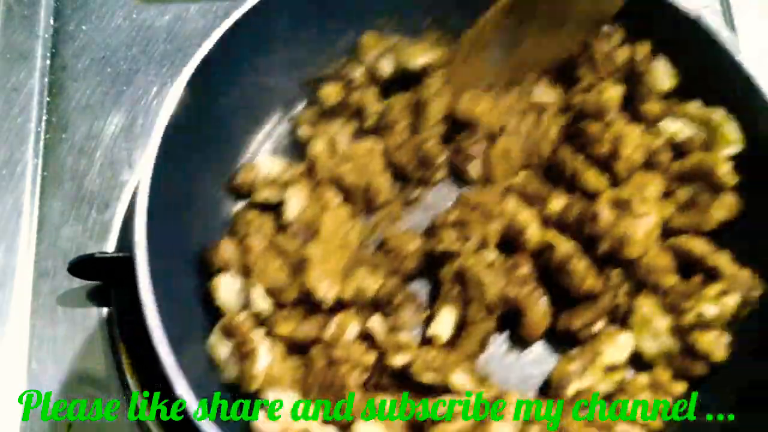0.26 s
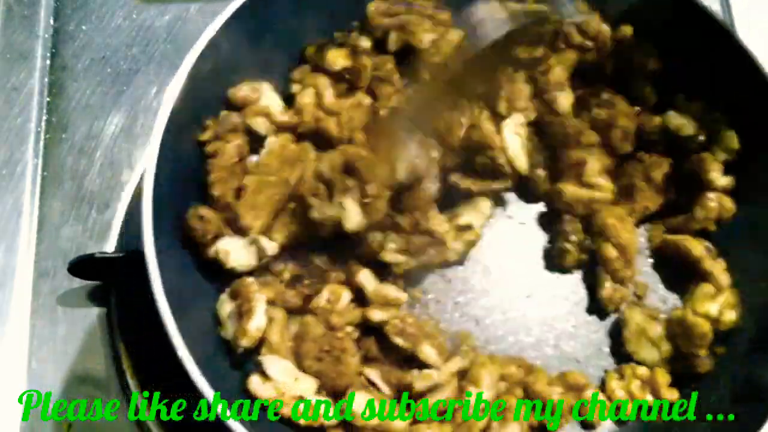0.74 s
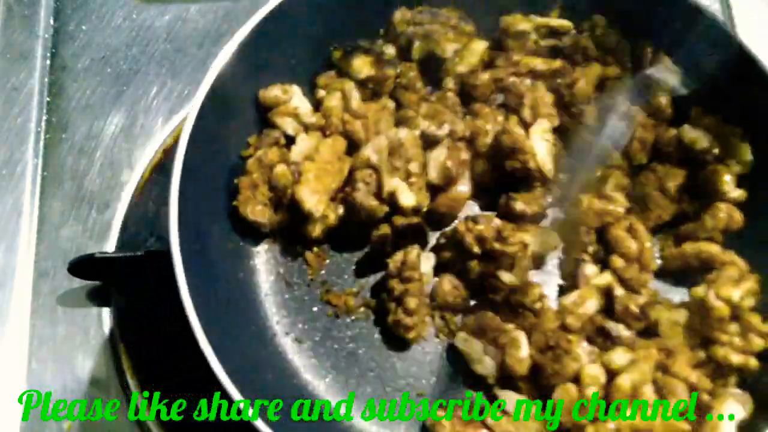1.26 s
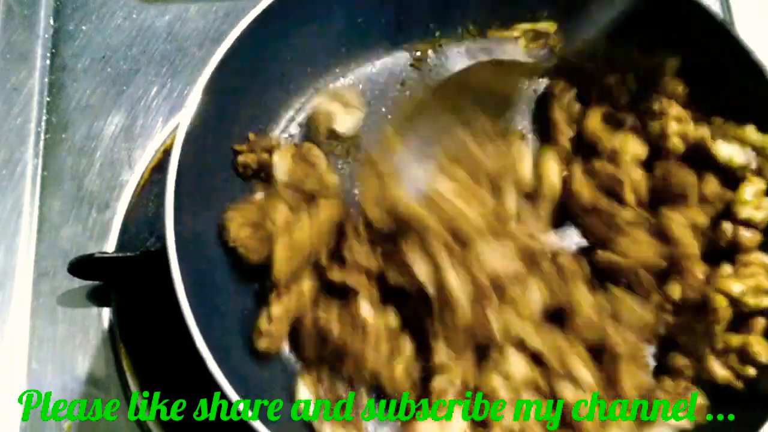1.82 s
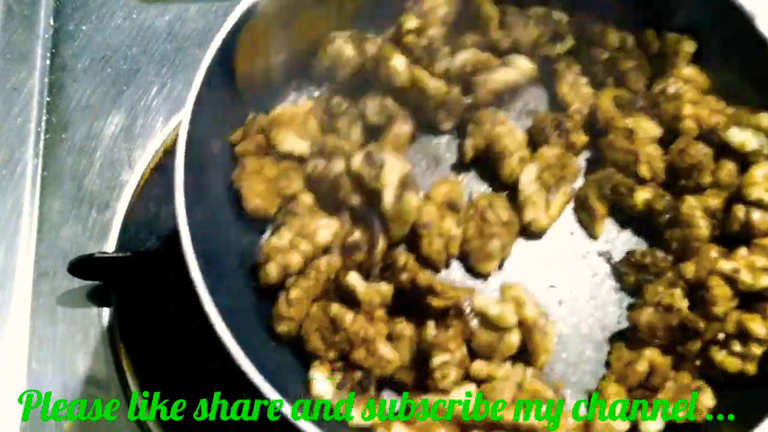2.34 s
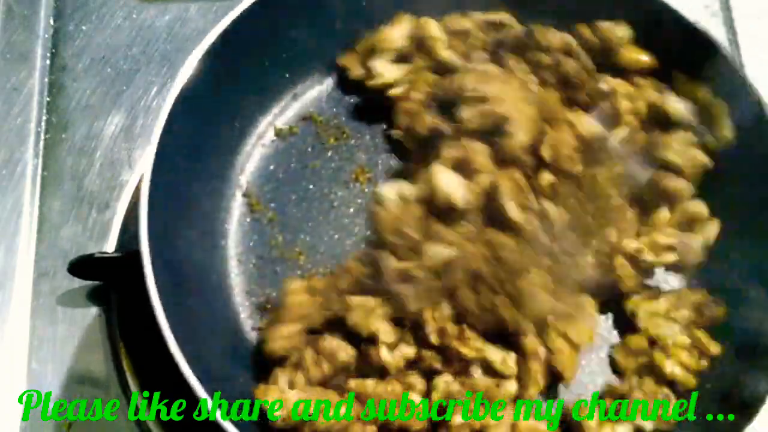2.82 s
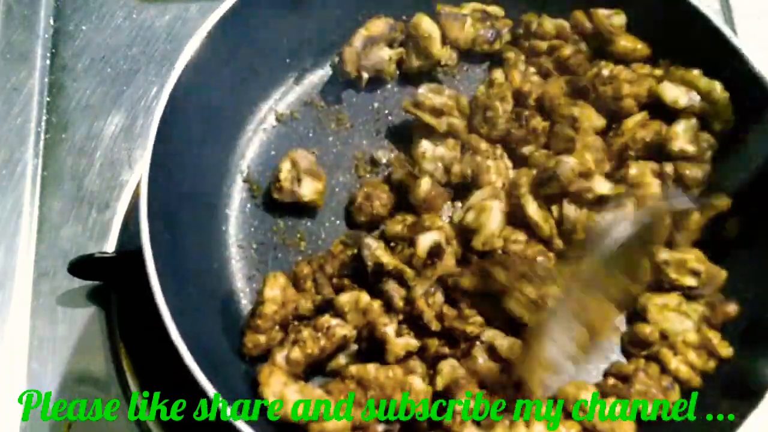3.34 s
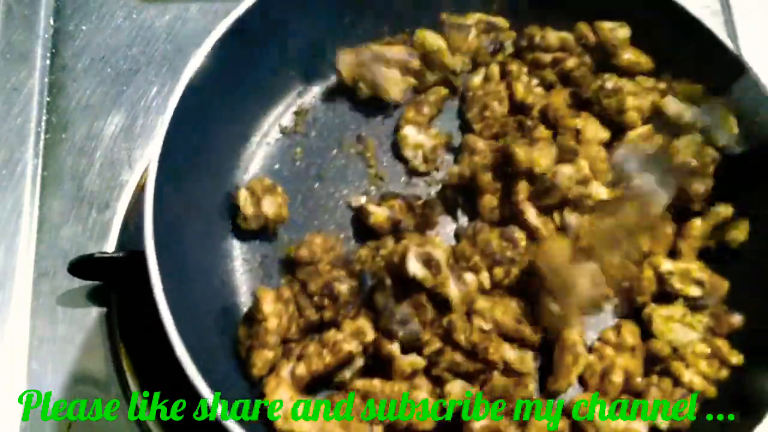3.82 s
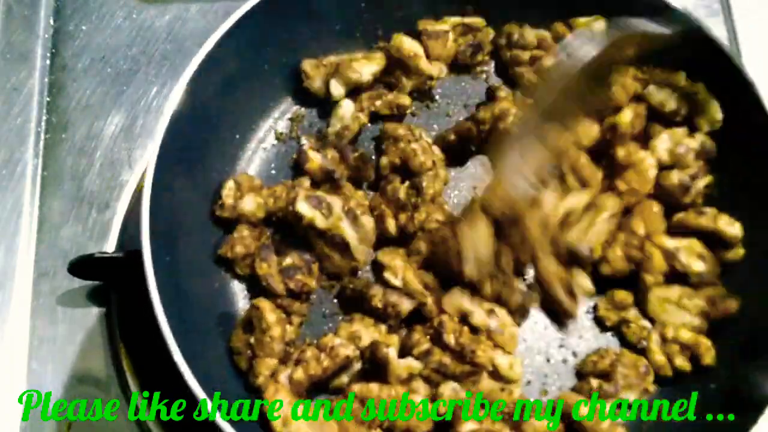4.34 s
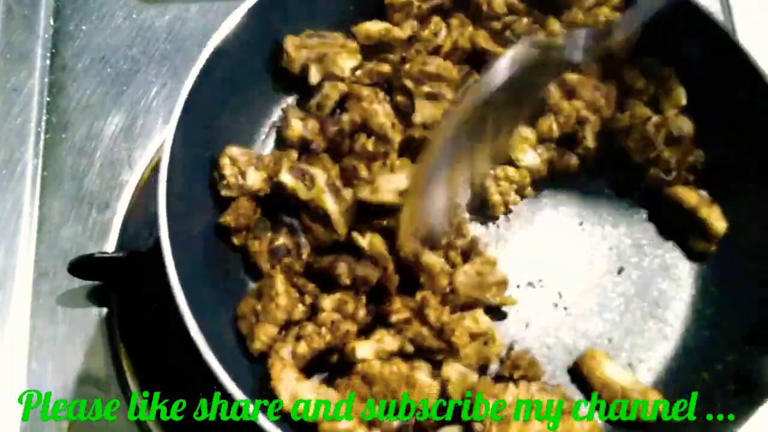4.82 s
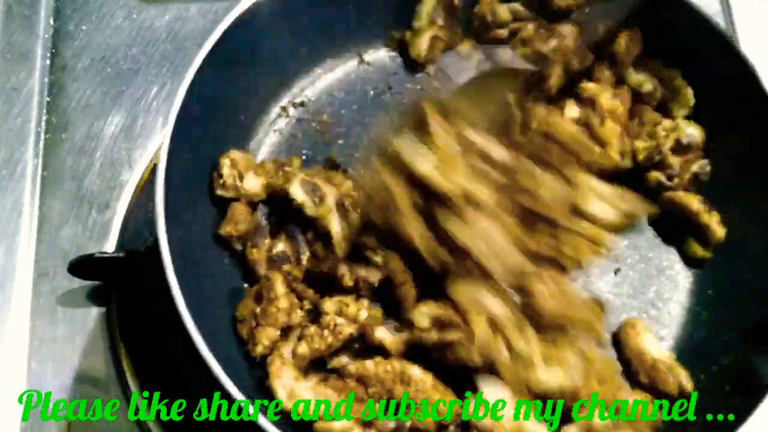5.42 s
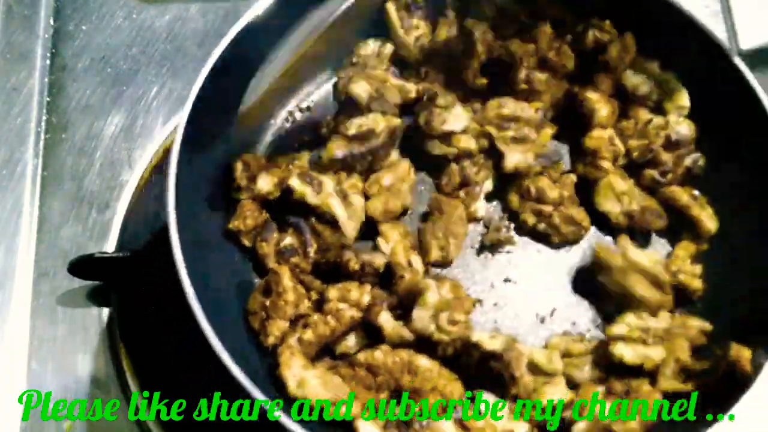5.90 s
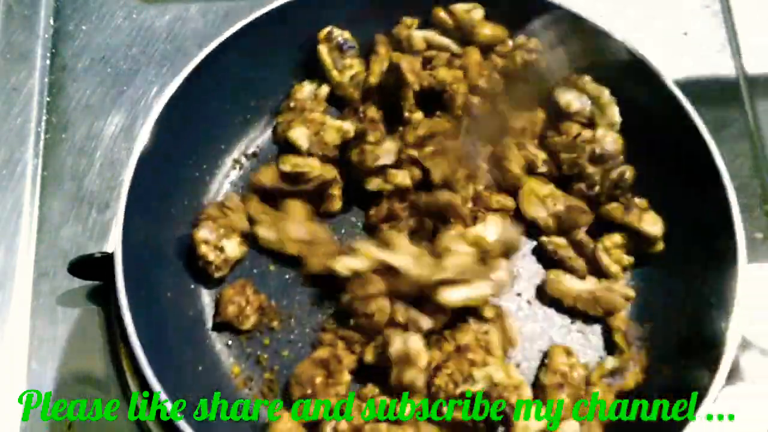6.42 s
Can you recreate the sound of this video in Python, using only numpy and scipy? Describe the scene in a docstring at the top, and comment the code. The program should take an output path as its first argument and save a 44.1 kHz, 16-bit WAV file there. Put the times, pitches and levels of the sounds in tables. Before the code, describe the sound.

Close stereo pickup in a small kitchen: gentle nut rattling at first, a firm spoon knock just after one second, then a bright metallic clack with a short scrape. Steady uneven stirring continues, nuts pattering between strokes. Strong knocks return around four and a half and five seconds, followed by a raspy scrape, then softer tumbling and airy swishes to the end. Low rumble and faint hum lie underneath.

```python
"""Walnuts tumble and rub in a non-stick pan as a steel spoon stirs them, close to a phone in a small kitchen.
Modal synthesis: random small contacts excite the pan's damped modes, louder during each stroke.
The spoon knocks the pan with a tick of its own steel and now and then scrapes it; single nuts drop back.
Filtered noise makes the grate bumps, swishes, rumble and thin high hiss; sines make a faint hum and drone.
"""
import sys
import numpy as np
from scipy import signal
from scipy.fft import rfft, irfft, next_fast_len
from scipy.io import wavfile
from scipy.ndimage import uniform_filter1d, map_coordinates

SR = 44100
rng = np.random.default_rng(int(sys.argv[2]) if len(sys.argv) > 2 else 0)


def transcribe(signal):
    """Save signal, clipped to [-1, 1], as a 16-bit WAV file at the path in sys.argv[1]."""
    frames = np.atleast_2d(signal).T
    limited = np.clip(frames, -1, 1)
    pcm = np.round(limited * 32767).astype(np.int16)
    wavfile.write(sys.argv[1], SR, pcm)


N = 293641  # length in samples

# Modes of the pan loaded with nuts. Each row: frequency in Hz, relative level in dB,
# undamped-by-spoon t60 in s, phase lead of the right side in radians.
PAN_MODES = [(980.3, 8.5, 0.048, -0.54), (1059, -6.5, 0.063, -0.8), (1814.6, 2.5, 0.057, 1.48),
             (2864, 3, 0.032, -2), (3014, -17, 0.08, -1), (3440, -13.5, 0.067, -2.5),
             (3710, -24, 0.089, -0.5), (4247, -3.5, 0.036, -1.88), (4390, -27.5, 0.079, 0.5),
             (4820, -10.5, 0.045, 1.5), (5808, -12, 0.04, -1.5), (6195, -20, 0.063, 4.5)]
# Modes of the steel spoon. Each row: frequency in Hz, relative level in dB, t60 in s,
# phase lead of the right side in radians.
SPOON_MODES = [(7350, -9, .025, 1), (7640, -3, .025, 0), (8650, -9, .025, -1), (9585, -1, .045, .4),
               (10600, -3, .028, -1.2), (11280, -4, .02, 2), (11920, 0, .04, .5), (12350, -2, .025, -1),
               (12750, -2, .025, -2), (13100, -6, .022, 1), (14000, -8, .02, 1.4)]
# Broad crack of a contact on the pan. Each row: frequency in Hz, relative density in dB per Hz.
CRACK_SPECTRUM = [(60, -47), (400, -16), (600, -21.5), (780, -8.5), (950, 28), (1300, 17.5), (2200, 7),
                  (2500, 14), (3100, 15), (4500, 9), (5000, 7.5), (5400, -3.5), (6300, -1.5), (7200, -53),
                  (12000, -49)]
# Broad click of the spoon's steel. Each row: frequency in Hz, relative density in dB per Hz.
TICK_SPECTRUM = [(3000, -58), (6000, -13), (8500, -10.5), (10000, 3), (11500, -1), (14000, -11),
                 (15500, -13)]
LEAD_SCATTER = 0.76  # radians by which the contact spot shifts a mode between the sides
LEAN_SCATTER_DB = 3.5  # the contact spot also beams each mode more to one side
PAN_LOW_HZ, BLOW_LOW_HZ = 842, 740  # tumbling and blows radiate little below these

# Low rumble of the kitchen. Each row: frequency in Hz, relative density in dB per Hz.
RUMBLE_SPECTRUM = [(15, -7.5), (25, -34), (45, -0.5), (70, 1), (115, -2), (170, -6.5), (240, -12.5),
                   (325, -10.5), (450, -18), (700, -20.5), (1000, -38), (1500, -36), (2200, -70),
                   (3500, -121)]
# High hiss, also the colour of the crumbs. Each row: frequency in Hz, relative density in dB per Hz.
HISS_SPECTRUM = [(8600, -44.5), (9600, -6.5), (10700, -0.5), (11800, 1), (13000, -3), (14200, -8),
                 (15000, -21), (16000, -56.5)]
# Hum partials. Each row: mean frequency in Hz, middle level in dB rms.
HUM_PARTIALS = [(52, -65.5), (101, -61), (138, -64.5), (312, -70.5)]
# Path of the drone. Each row: time in seconds, frequency in Hz, level in dB rms.
DRONE_PATH = [(2.6, 67, -75), (2.95, 66.8, -56.5), (3.3, 67.6, -54), (3.7, 69.35, -50.5),
              (3.98, 74.6, -46.5), (4.2, 75, -73)]
RUMBLE_DB, RUMBLE_WAVER_DB, HUM_WAVER_DB, HISS_DB = -52, 1.98, 4.5, -64.5
# Likeness of the two sides in diffuse noise. Each row: frequency in Hz, correlation from 0 to 1.
SIDE_LIKENESS = [(60, 0.94), (130, 0.99), (260, 0.74), (500, 0.45), (1000, 0.33), (2000, 0.2), (10000, 0)]

# Strokes of the spoon through the nuts. Each row: start in seconds, push in s, release in s,
# tumbling level in dB, rubbing level in dB.
STROKES = [(0.274, 0.064, 0.18, -56.5, -64), (0.551, 0.16, 0.071, -48.5, -55),
           (1.027, 0.13, 0.085, -51, -50.5), (1.41, 0.064, 0.11, -47.5, -52.5),
           (1.721, 0.049, 0.2, -48.5, -47.5), (2.074, 0.091, 0.14, -43.5, -55.5),
           (2.388, 0.088, 0.19, -55, -53), (2.761, 0.11, 0.025, -48.5, -56.5),
           (3.069, 0.067, 0.1, -51, -58), (3.382, 0.026, 0.17, -52, -60), (3.649, 0.045, 0.11, -49.5, -51),
           (3.973, 0.052, 0.11, -46.5, -53.5), (4.265, 0.058, 0.22, -61.5, -59.5),
           (4.572, 0.12, 0.093, -48, -49), (5.027, 0.027, 0.24, -55.5, -60),
           (5.339, 0.086, 0.2, -50.5, -56.5), (5.67, 0.096, 0.16, -47.5, -54.5),
           (6.031, 0.085, 0.15, -51.5, -56.5), (6.331, 0.08, 0.083, -48.5, -53.5)]
STROKE_DEPTH_DB, PUSH_SHAPE, RELEASE_SHAPE = 25, 2.05, 1.94  # drop at both ends; powers of rise and fall
TUMBLE_LAG_S, TUMBLE_LINGER = 0.006, 1.33  # the nuts follow the spoon late and settle more slowly
ROLL_DB, ROLL_SHARE = -1, 0.57  # rolling lies between tumbling and rubbing; share of rubbing in its level
REST_TUMBLE_DB, REST_RUB_DB = -68.5, -84.5  # nuts settling between strokes
RUB_CLUMP_DB, RUB_CLUMP_RATE = 2.5, 70  # rubbing catches and slips in clumps: spread, knots per second

# Single nuts dropping on the pan floor. Each row: time in seconds, first mode in Hz,
# first mode level in dB, second mode over the first in dB.
DROPS = [(0.0035, 950, -42, -5.5), (0.0619, 1000, -43.5, -12), (0.3418, 907, -48, -16),
         (0.3982, 964, -45, -28), (0.4363, 947, -46.5, -32), (0.6515, 990, -47, -1), (0.716, 990, -49, -26),
         (0.748, 970, -50, -10), (0.9776, 945, -41, -43), (1.132, 1030, -39.5, -29), (1.394, 1003, -46, -9),
         (1.4172, 960, -46, -21), (1.45, 1020, -43.5, -24), (1.4925, 1026, -43, -19),
         (1.5243, 972, -40.5, -32), (1.584, 960, -44.5, -30), (1.785, 946, -40, -23), (1.8846, 960, -49, 0),
         (2.1794, 983, -56, -14), (2.2226, 1000, -38, -11), (2.308, 973, -45.5, -26),
         (2.509, 975, -37.5, -14), (2.6445, 1014, -38, -22), (2.671, 960, -46.5, -18),
         (2.7416, 995, -49.5, -29), (2.875, 970, -36, -24.5), (2.94, 996, -45, -17.5),
         (3.1672, 994, -46.5, -2), (3.2429, 980, -45.5, -11), (3.4474, 944, -47, -5),
         (3.4673, 983, -42, -9), (3.5188, 985, -46, -5.5), (3.7605, 978, -43, -31),
         (3.8741, 1023, -43.5, -14), (4.0751, 953, -43.5, -18.5), (4.142, 991, -40.5, -34),
         (4.179, 960, -49.5, -28), (4.349, 947, -46, -9.5), (4.3756, 1020, -46, -20),
         (4.6857, 936, -45.5, 3), (4.9819, 953, -46, -42), (5.0616, 1025, -44, -23),
         (5.3895, 928, -38.5, -16), (5.4885, 980, -53, -6), (5.5894, 956, -43.5, -21),
         (5.605, 968, -44.5, -16), (5.769, 990, -45, -15), (5.8106, 980, -43.5, -11),
         (5.881, 1000, -42, -22), (5.923, 978, -47, -7.5), (6.022, 977, -46, -8), (6.0567, 980, -44.5, -25),
         (6.1031, 1010, -49.5, 2), (6.1329, 1050, -46.5, -3), (6.172, 1004, -49.5, -0.5),
         (6.217, 995, -50, -21), (6.259, 1005, -52.5, -12), (6.381, 970, -45, -19), (6.4057, 980, -53, -15),
         (6.4624, 1020, -46.5, -11), (6.64, 1034, -48.5, -10)]
DROP_HARDNESS_DB, DROP_LEAN_DB, DROP_DAMPING = -11, 12.5, 1  # soft nut: upper modes against the second
DROP_SECOND_HZ, DROP_SPREAD_HZ = 1860, 51  # the landing spot moves the second mode

# Spoon knocking the pan. Each row: time in seconds, first mode in Hz, second mode in Hz,
# first mode level in dB, second mode over the first in dB,
# hardness (upper modes over the first) in dB, left minus right in dB.
KNOCKS = [(0.6273, 1020, 1770, -50, 0, -7, 4), (0.6765, 1020, 1800, -45, -4, -7, 20),
          (1.096, 985, 1800, -41.5, -11, -19, -10), (1.1553, 1030, 1810, -30.5, -5.5, -11, -7),
          (1.1643, 954, 1840, -46, 14, -17, -11), (1.728, 1000, 1746, -35, 6, 9, -4),
          (1.729, 1273, 1700, -33, -8, -23, 4), (1.853, 990, 1790, -48, -5, -5, 17),
          (2.1311, 988, 1810, -37.5, -18, -35, 8), (2.1515, 1038, 1790, -38.5, 0.5, -10, 10.5),
          (2.409, 948, 1760, -33, -9, -21.5, 8), (2.4584, 930, 1790, -32.5, -30, -12.5, -4),
          (3.078, 1020, 1840, -46, -6, -28.5, 4), (3.1345, 1030, 1805, -52.5, 9.5, -9, -2),
          (3.3992, 1006, 1820, -46.5, 12.5, -5, 3.5), (3.6617, 860, 1770, -43.5, -18, -17, -2),
          (3.7311, 1004, 1830, -39, -11.5, -38, 14), (4.0165, 970, 1860, -48, -5, -7, -8),
          (4.029, 1097, 1750, -35.5, -2.5, -12, 12), (4.32, 1010, 1816, -35, 7, -1, 1),
          (4.4702, 993, 1760, -36, -12, -10.5, -2), (4.5784, 1005, 1890, -25, -4.5, 1.5, 0),
          (4.61, 953, 1930, -49, 6.5, 4.5, 13), (4.7132, 1004, 1825, -34, -5.5, -28, -16),
          (5.073, 1060, 1830, -38.5, -9, -28, 6), (5.0783, 1030, 1900, -29, -18, -22.5, 3),
          (5.1267, 983, 1840, -38.5, -2, -21, -3), (5.2115, 1014, 1840, -37, -5.5, -12.5, -1),
          (5.237, 1030, 1800, -49.5, 3.5, -8, 5), (5.3318, 954, 1770, -36.5, -12, -28, 3.5),
          (5.5445, 1000, 1790, -39.5, -9, -17, -1), (5.6446, 1000, 1680, -49.5, -2.5, -13, -5),
          (5.7468, 954, 1780, -52, 3, -5, 3), (5.9809, 1015, 1810, -33, -9, -20.5, 9),
          (6.429, 985, 1800, -40.5, -4, -30, -10)]
SPOON_DAMPING = 0.82  # the pressing spoon shortens the pan's ring by this factor
STEEL_DB = -21  # steel tick against the upper modes
EDGE_HARDNESS_DB, EDGE_SLOPE = 2.5, 3.92  # above this the bare edge hits; tick growth in dB per dB

# Spoon edge sliding on the coating. Each row: middle in seconds, half length in s,
# lower pan modes in dB, higher pan modes in dB, steel in dB.
SCRAPES = [(1.16, 0.015, -53, -48, -56.5), (1.732, 0.0029, -25, -29, -28.5),
           (1.761, 0.014, -46.5, -48, -46), (1.816, 0.0082, -38, -39, -47.5),
           (1.865, 0.0072, -43.5, -63, -62), (2.483, 0.013, -33.5, -41, -42.5),
           (2.499, 0.012, -52, -43.5, -61), (2.831, 0.018, -56.5, -60, -75),
           (3.133, 0.0067, -63, -53, -80.5), (4.292, 0.0059, -50.5, -54.5, -54.5),
           (4.577, 0.01, -54, -49, -50), (4.602, 0.015, -53.5, -56, -57), (4.656, 0.012, -45, -45, -48),
           (5.413, 0.017, -36, -36, -42.5), (6.442, 0.014, -67, -77, -58.5)]
# Low shudder of the pan under the edge. Each row: frequency in Hz, relative density in dB per Hz.
SHUDDER_SPECTRUM = [(150, -37.5), (300, 0.5), (450, -4), (650, -1), (800, -6.5), (1100, -34.5)]
SCRAPE_SPLIT_HZ, SHUDDER_DB = 3500, -18.5  # shudder level against the lower pan modes

# Pan bumping the burner grate. Each row: time in seconds, level in dB.
THUDS = [(1.727, -65), (2.407, -61), (2.457, -54), (2.486, -72), (3.401, -63), (4.319, -78), (4.58, -65),
         (5.331, -56.5)]
# Colour of a bump. Each row: frequency in Hz, relative density in dB per Hz.
THUD_SPECTRUM = [(60, 3.5), (150, 17), (300, 8), (400, 28), (600, -16), (1000, -54.5), (3000, -68)]
# Brief dips of the low mids. Each row: middle in seconds, half length in s.
DIPS = [(1.848, 0.026), (2.147, 0.0092), (2.828, 0.0064), (3.145, 0.015), (3.708, 0.0072), (5.454, 0.022)]
DIP_DB, DIP_HZ, DIP_WIDTH_HZ = -28.5, 600, 244
# Soft toneless swishes behind the stirring. Each row: middle in seconds, half length in s,
# broad part in dB, airy part in dB.
SWISHES = [(2.02, 0.093, -63.5, -81), (2.392, 0.068, -70, -75), (2.625, 0.039, -68, -86),
           (4.883, 0.094, -86, -69), (5.34, 0.013, -55.5, -76), (5.97, 0.07, -67.5, -75.5),
           (6.25, 0.09, -59, -76), (6.545, 0.047, -63, -70.5), (6.65, 0.031, -56.5, -60.5)]
# Broad part of a swish. Each row: frequency in Hz, relative density in dB per Hz.
BROAD_SPECTRUM = [(300, 0), (600, 9.5), (1200, -5), (2200, 2.5), (3200, -3.5), (4600, -6), (5300, -17),
                  (6100, -11.5), (6800, -54)]
# Airy part of a swish. Each row: frequency in Hz, relative density in dB per Hz.
AIRY_SPECTRUM = [(2400, -34.5), (2900, -2.5), (3700, 0), (4250, -1), (4900, -13), (6100, -16.5),
                 (6800, -47.5)]

# Decay of the kitchen. Each row: frequency in Hz, t60 in s.
KITCHEN_DECAY = [(200, 0.088), (1000, 0.25), (1800, 0.34), (4000, 0.39), (8000, 0.093), (12000, 0.16)]
# Side balance of nuts and scrapes. Each row: frequency in Hz, left minus right in dB.
SIDE_LEAN = [(1000, -1.0), (1400, 0.5), (1800, 1.5), (2400, -2.5),
             (2900, -3.5), (4300, 2.5), (8000, -2.5), (12500, 8.0)]
TOP_HZ = 15420  # the phone's band limit, 12 dB down


def amp(db):
    """Logarithmic level: decibels to linear gain."""
    return 10 ** (np.asarray(db) / 20)


def unit(x):
    """Power normalization: scale to rms 1."""
    return x / np.sqrt(np.mean(x ** 2) + 1e-20)


def full_scale(x):
    """Short-time power: scale a blow so that its loudest 4 ms have rms 1."""
    power = uniform_filter1d(np.mean(x ** 2, 0), size=SR // 250)
    return x / np.sqrt(power.max())


def along(points, hz):
    """Logarithmic frequency scale: interpolate (Hz, value) points on it."""
    f, v = np.transpose(points)
    return np.interp(np.log(hz + 1), np.log(f + 1), v)


def curves(rows):
    """Linear interpolation: one value per sample for each column after the time."""
    s, *cols = np.transpose(rows)
    return [np.interp(np.arange(N) / SR, s, c) for c in cols]


def wobble(rate):
    """Slow random modulation: a smooth curve through rate random knots a second."""
    knots = rng.standard_normal(int(N * rate / SR) + 4)
    return map_coordinates(knots, [np.arange(N) * rate / SR])


def swell(s, half):
    """Gaussian envelope: a bell-shaped gain around the time s."""
    return np.exp(-.5 * ((np.arange(N) / SR - s) / half) ** 2)


def add(out, s, sound):
    """Superposition: mix a short sound into out at the time s."""
    part = out[:, max(round(s * SR), 0):][:, :sound.shape[1]]
    part += sound[:, :part.shape[1]]


def filtered(x, response):
    """Linear filtering: multiply the spectrum of x by a gain that depends on frequency."""
    n = x.shape[-1]
    m = next_fast_len(n + n // 8)
    return irfft(rfft(x, m) * response(np.fft.rfftfreq(m, 1 / SR)), m)[..., :n]


def noise(spectrum, size=N):
    """Diffuse-field coherence: stereo noise of rms 1, alike in the bass, unrelated in the treble."""
    def mid_side_gain(hz):
        turn = np.arccos(np.clip(along(SIDE_LIKENESS, hz), -1, 1)) / 2
        return amp(along(spectrum, hz)) * np.array([np.cos(turn), np.sin(turn)])
    mid, side = filtered(rng.standard_normal((2, size)), mid_side_gain)
    return unit(np.array([mid + side, mid - side]))


def background():
    """Stationary noise and sines: rumble, wavering hum, a drone that swells once, thin high hiss."""
    def tone(hz):
        return np.sqrt(2) * np.sin(2 * np.pi * np.cumsum(hz) / SR)
    rumble = amp(RUMBLE_DB + RUMBLE_WAVER_DB * wobble(7.2)) * noise(RUMBLE_SPECTRUM)
    hum = sum(amp(db + HUM_WAVER_DB * wobble(6.2)) * tone(hz * (1 + 0.02004 * wobble(6)))
              for hz, db in HUM_PARTIALS)
    drone_hz, drone_db = curves(DRONE_PATH)
    hiss = amp(HISS_DB) * noise(HISS_SPECTRUM) * amp([[1.8], [-1.8]])  # louder on the left
    return rumble + hum + amp(drone_db) * tone(drone_hz) + hiss


def ring(modes, crack, crack_db, crack_t60, scatter_db, detune):
    """Modal excitation: each contact spot drives the damped modes differently, over a short crack."""
    t = np.arange(SR // 16) / SR
    hz, db, t60, lead = np.transpose(modes)[:, :, None]
    size, shift, turn, lean = rng.standard_normal((4, len(modes), 1))
    phase = 2 * np.pi * hz * (1 + detune * shift) * t  # each contact shifts the modes a little
    fade = amp(db + scatter_db * size - 60 * t / t60)
    lead = lead + LEAD_SCATTER * turn
    lean_db = LEAN_SCATTER_DB * lean
    tones = np.array([(fade * amp(side * lean_db / 2) * np.sin(phase + side * lead / 2)).sum(0)
                      for side in (-1, 1)])
    burst = noise(crack, size=len(t)) * amp(crack_db - 60 * t / crack_t60)
    onset = 1 - np.exp(-t / .0005)
    return (tones + burst) * onset


def registers(x):
    """Band splitting: part the pan's sound into first mode, second mode and upper modes."""
    bands = [(1400, "lowpass"), ((1400, 2400), "bandpass"), (2400, "highpass")]
    return [signal.sosfilt(signal.butter(5, edge, kind, fs=SR, output="sos"), x) for edge, kind in bands]


def grains(rate, spread_db, make_ring, count=24):
    """Random impulse train: tiny contacts, rate a second, at a new spot of the metal every 50 ms."""
    chance, size = rng.random(N), rng.standard_normal(N)
    strength = amp(spread_db * np.minimum(np.abs(size), 2))
    force = (chance < rate / SR) * np.sign(size) * strength
    spots = [unit(make_ring()) for spot in range(count)]
    out, step = np.zeros((2, N + SR)), SR // 20
    for k, start in enumerate(range(0, N, step)):
        patter = signal.fftconvolve(force[None, start:start + step], spots[k % count], axes=1)
        out[:, start:start + patter.shape[1]] += patter
    return unit(out[:, :N])


def stroke(start, push, release):
    """Amplitude envelope: the gain builds while the spoon pushes and dies as the nuts settle."""
    t = np.arange(N) / SR - start - push
    rise = (np.maximum(-t, 0) / push) ** PUSH_SHAPE
    fall = (np.maximum(t, 0) / release) ** RELEASE_SHAPE
    return amp(-STROKE_DEPTH_DB * np.minimum(rise + fall, 10))


def nuts():
    """Granular friction: nuts tumble softly on the pan floor and rub with finer, brighter grains."""
    tumbling, rubbing = amp(REST_TUMBLE_DB), amp(REST_RUB_DB)
    for start, push, release, tumble_db, rub_db in STROKES:
        tumbling = tumbling + amp(tumble_db) * stroke(start + TUMBLE_LAG_S, push, release * TUMBLE_LINGER)
        rubbing = rubbing + amp(rub_db) * stroke(start, push, release)
    rolling = amp(ROLL_DB) * tumbling * (rubbing / tumbling) ** ROLL_SHARE

    coarse = grains(240, 4.2, lambda: ring(PAN_MODES, CRACK_SPECTRUM, -2, 0.043, 4.6, detune=0.022), count=40)
    tumble = registers(coarse)[0]
    tumble = filtered(tumble, lambda hz: 1 / np.hypot(1, (PAN_LOW_HZ / (hz + 1)) ** 6))
    fine = grains(1600, 3.0, lambda: ring(PAN_MODES, CRACK_SPECTRUM, -1.3, 0.02, 2.7, detune=0.008), count=40)
    _, roll, rub = registers(fine)
    rub = rub * amp(RUB_CLUMP_DB * wobble(RUB_CLUMP_RATE))
    body = tumbling * unit(tumble) + rolling * unit(roll) + rubbing * unit(rub)

    # fine grit crackles under the spoon
    crumbs = grains(2000, 4.5, lambda: noise(HISS_SPECTRUM, size=SR // 500))
    return body + np.minimum(rubbing, amp(-44)) * amp(-7.5) * crumbs


def blow(first_hz, second_hz, second_db, hardness_db, lean_db, damping):
    """Impact hardness: the harder the contact, the more one blow wakes the pan's upper modes."""
    modes = np.array(PAN_MODES, float)
    modes[:2, 0] = first_hz, second_hz  # the two lowest rows depend on where the pan is pressed
    # the coating cushions the blow, so the highest modes get less of it
    modes[:, 1] -= 10 * np.log10(1 + (modes[:, 0] / 3400) ** 4)
    modes[:, 2] *= damping
    low_cut = signal.butter(4, BLOW_LOW_HZ, "highpass", fs=SR, output="sos")
    struck = signal.sosfilt(low_cut, ring(modes, CRACK_SPECTRUM, -9.5, 0.12, 2.2, detune=0.011))
    first, second, upper = map(full_scale, registers(struck))
    sides = unit(amp(np.array([[lean_db], [-lean_db]]) / 2))  # higher modes beam to one side
    return first + sides * (amp(second_db) * second + amp(hardness_db) * upper)


def drops():
    """Soft impact: single nuts fall off the heap with a dull tock, each with its own pitch and colour."""
    out = np.zeros((2, N))
    for s, first_hz, db, second_db in DROPS:
        second_hz = DROP_SECOND_HZ + DROP_SPREAD_HZ * rng.standard_normal()
        hardness_db = second_db + DROP_HARDNESS_DB
        tock = blow(first_hz, second_hz, second_db, hardness_db, DROP_LEAN_DB, DROP_DAMPING)
        add(out, s, amp(db) * tock)
    return out


def knocks():
    """Coupled impact: the spoon rings the pan and its own steel ticks, loudly when the bare edge strikes."""
    out = np.zeros((2, N))
    for s, first_hz, second_hz, db, second_db, hardness_db, lean_db in KNOCKS:
        tick_db = hardness_db + STEEL_DB + EDGE_SLOPE * max(hardness_db - EDGE_HARDNESS_DB, 0)
        steel = full_scale(ring(SPOON_MODES, TICK_SPECTRUM, 19, 0.025, 1.1, detune=0.003))
        pan = blow(first_hz, second_hz, second_db, hardness_db, lean_db, SPOON_DAMPING)
        add(out, s, amp(db) * (pan + amp(tick_db) * steel))
    return out


def scrapes():
    """Stick-slip: the edge chatters over the coating in brief swells; its angle decides which modes speak."""
    pan = grains(3000, 0.93, lambda: ring(PAN_MODES, CRACK_SPECTRUM, 0.59, 0.018, 3.1, detune=0.0073))
    pan = filtered(pan, lambda hz: hz / np.hypot(hz, 1800))  # tiny sharp slips drive the first mode less
    lower = unit(filtered(pan, lambda hz: hz < SCRAPE_SPLIT_HZ))
    lower = lower + amp(SHUDDER_DB) * noise(SHUDDER_SPECTRUM)
    higher = unit(filtered(pan, lambda hz: hz >= SCRAPE_SPLIT_HZ))
    steel = grains(6300, 1.3, lambda: ring(SPOON_MODES, TICK_SPECTRUM, 16.4, 0.0074, 1, detune=0.003))
    return sum(swell(s, half) * (amp(lower_db) * lower + amp(higher_db) * higher + amp(steel_db) * steel)
               for s, half, lower_db, higher_db, steel_db in SCRAPES)


def thuds():
    """Damped low-frequency impact: firm pushes bump the pan against the burner grate."""
    out, t = np.zeros((2, N)), np.arange(SR // 10) / SR
    for s, db in THUDS:
        bump = noise(THUD_SPECTRUM, size=len(t)) * amp(-60 * t / 0.26) * (1 - np.exp(-t / 0.0027))
        add(out, s, amp(db) * full_scale(bump))
    return out


def kitchen(x):
    """Reverberation: the hard walls answer with a short diffuse tail, 5 ms late."""
    hz, t, z = signal.stft(rng.standard_normal((2, SR // 2)), SR, nperseg=256)
    decay = amp(-60 * t / along(KITCHEN_DECAY, hz)[:, None])
    tail = signal.istft(z * decay, SR, nperseg=256)[1]
    tail = np.pad(tail / np.linalg.norm(tail[0]), ((0, 0), (SR // 200, 0)))
    return signal.fftconvolve(x, tail, axes=1)[:, :N]


def dipped(x):
    """Band attenuation: the band under the pan's first mode ducks for a moment."""
    band = filtered(x, lambda hz: np.exp(-((hz - DIP_HZ) / DIP_WIDTH_HZ) ** 4))
    gain = amp(DIP_DB * sum(swell(s, half) for s, half in DIPS))
    return x + band * (gain - 1)


def swishes():
    """Broadband noise: diffuse, slightly ragged swishes come and go without ringing the pan."""
    broad, airy = noise(BROAD_SPECTRUM), noise(AIRY_SPECTRUM)
    swish = sum(swell(s, half) * (amp(broad_db) * broad + amp(airy_db) * airy)
                for s, half, broad_db, airy_db in SWISHES)
    return amp(1.0 * wobble(90)) * swish


def scene():
    """Superposition: pan and spoon in the kitchen; nuts and scrapes lean to a side by frequency."""
    sliding = filtered(nuts() + scrapes(), lambda hz: amp(np.outer([.5, -.5], along(SIDE_LEAN, hz))))
    stirring = sliding + knocks() + drops() + thuds()
    return dipped(stirring + amp(-16.0) * kitchen(stirring) + swishes() + background())


def record(dry):
    """Band limiting: the phone cuts the treble steeply above its limit."""
    return filtered(dry, lambda hz: amp(np.interp(hz, [TOP_HZ - 600, TOP_HZ, TOP_HZ + 900], [0, -12, -90])))


dry = scene()
out = record(dry)
transcribe(out)
```